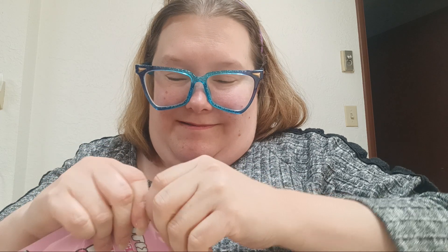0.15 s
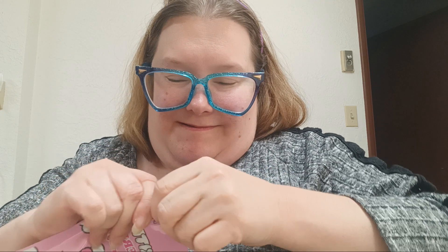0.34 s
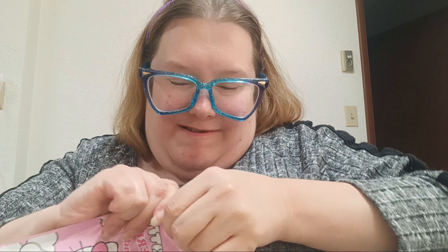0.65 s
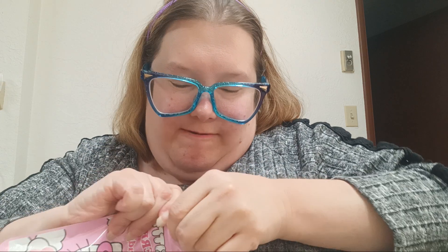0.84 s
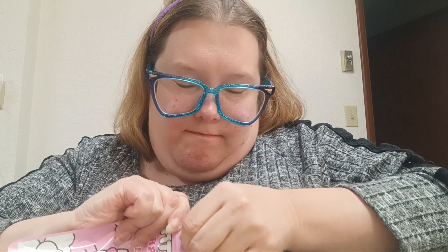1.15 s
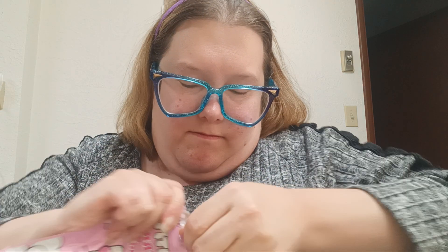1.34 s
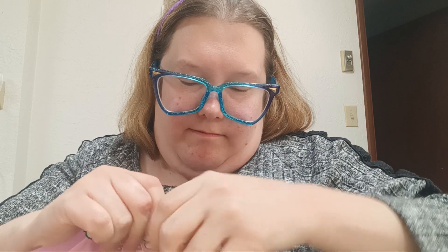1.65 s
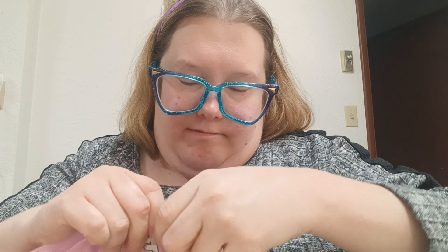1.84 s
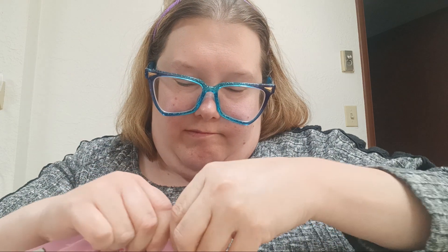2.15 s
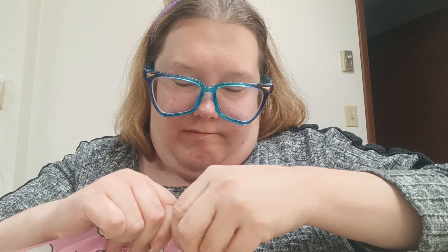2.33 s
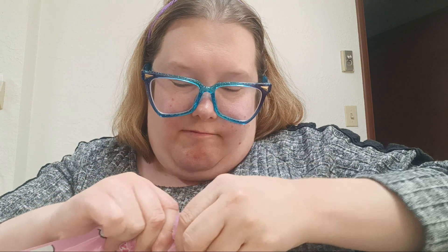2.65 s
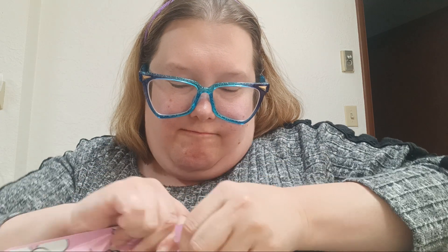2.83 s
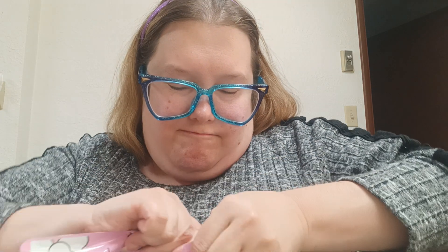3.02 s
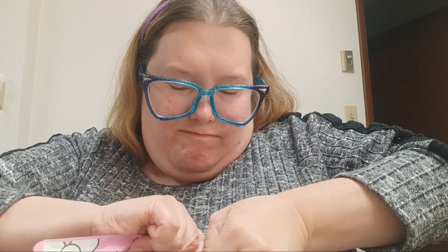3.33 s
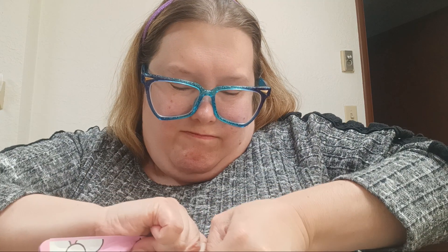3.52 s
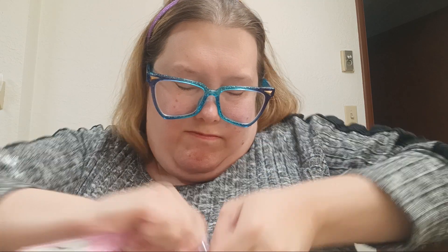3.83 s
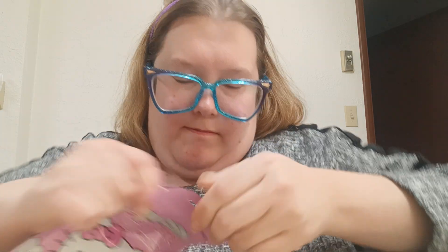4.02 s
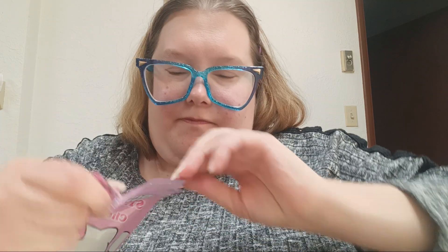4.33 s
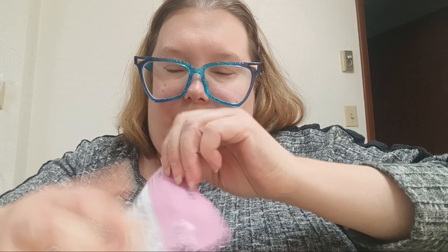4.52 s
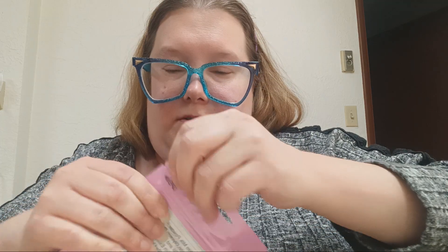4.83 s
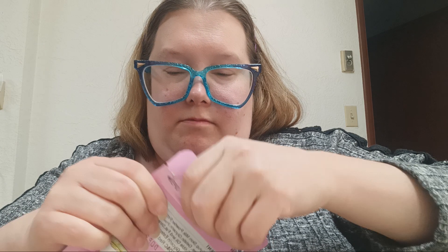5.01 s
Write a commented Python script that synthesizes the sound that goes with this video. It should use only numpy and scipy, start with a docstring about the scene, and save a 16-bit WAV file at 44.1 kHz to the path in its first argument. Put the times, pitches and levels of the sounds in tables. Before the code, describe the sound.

Close, dry crinkling of a small plastic packet being pulled open by hand: uneven snaps, tight rubbing creaks and final loud crackles.

```python
"""In a small room, fingers pull and tear at a plastic sweet wrapper close to the right microphone of a phone.
Creases snap over: noise-burst slips ring air pouch and film modes; crowds of tiny creases rustle.
Stick-slip rubs creak on taut film, band noise makes a swish and table rumble, brief pushes make air puffs.
The left microphone hears the wrapper later, shadowed by the phone; room reflections and a low murmur lie under it."""
import sys
import numpy as np
from scipy import signal
from scipy.fft import rfft, irfft, next_fast_len
from scipy.io import wavfile
from scipy.ndimage import uniform_filter1d

SR = 44100
rng = np.random.default_rng(int(sys.argv[2]) if len(sys.argv) > 2 else 0)


def log_audio(samples):
    """Write samples as a 16-bit WAV file to the path given in sys.argv[1]."""
    # one column per channel
    frames = np.atleast_2d(samples).T
    # limit to full scale, then quantise
    limited = np.clip(frames, -1, 1)
    pcm = np.round(limited * 32767).astype(np.int16)
    wavfile.write(sys.argv[1], SR, pcm)


N = 227811
GRAIN = 1024  # samples per slip
F_HZ = np.fft.rfftfreq(GRAIN, 1 / SR)

# creases snapping, peaks before the microphone's treble loss:
# (time [s], pouch boom [dB], panel ring [dB], tick [dB])
SNAPS = [(0.034, -36, -37, -15),  (0.0605, -23, -18, -24), (0.0724, -16.5, -13.5, -7.5),
         (0.0852, -13.5, -35, -5),  (0.0982, -19, -9.5, -7.5), (0.158, -19, -30, -36),
         (0.1731, -12.5, -11, -3), (0.1813, -11, -27, -7.5), (0.3267, -21.5, -23, -22),
         (0.3733, -26, -25, -21), (0.4836, -28, -27, -14.5), (0.5285, -17, -21, -18.5),
         (0.5565, -17.5, -40, -29), (0.6498, -15.5, -23.5, -20.5), (0.6874, -14.5, -9.5, -4.5),
          (0.7269, -12, -43, -26), (0.7447, -14, -17, -6.5), (0.7983, -14.5, -6.5, -4),
         (0.8363, -18, -13, -1.5), (0.8772, -24, -24.5, -38), (0.964, -21, -45, -50),
         (1.0368, -30.5, -88, -62), (1.0532, -23, -31.5, -110), (1.077, -25, -30, -59),
         (1.094, -21.5, -21.5, -43), (1.1113, -18.5, -14.5, -4), (1.146, -28, -20.5, -18),
         (1.189, -18.5, -19.5, -28), (1.2393, -26, -18, -15.5), (1.252, -17.5, -21, -23),
         (1.328, -23.5, -30, -37), (1.407, -24, -16, -12.5),  (1.4484, -60, -19, -6.5),
         (1.5782, -14.5, -15, -2), (1.633, -18, -10, -6.5), (1.672, -21, -24, -24),
         (1.68, -23.5, -21.5, -22), (1.7605, -25, -15, -16), (1.7684, -65, -48, -8),
         (1.7882, -19, -21, -14), (1.8153, -18, -17.5, -12), (1.847, -32, -23, -20.5),
         (1.866, -29, -35, -43), (1.927, -31.5, -33, -38), (1.9603, -24.5, -30, -23),
         (1.993, -29.5, -17, -20.5), (2.092, -31, -28.5, -26), (2.162, -32.5, -30, -47),
         (2.4134, -22.5, -18.5, -34),  (2.459, -29, -37, -33), (2.474, -17.5, -17, -3),
         (2.477, -23.5, -13, -11), (2.5195, -15, -11.5, -0.5),  (2.554, -21, -17, -6),
         (2.561, -24, -17, -23), (2.569, -16.5, -13.5, -2), (2.618, -27.5, -27, -27),
         (2.6399, -26, -16, -7.5), (2.65, -26.5, -35, -19), (2.663, -19, -21, -33),
         (2.6723, -17, -19, -3.5), (2.6826, -24, -15.5, -1.5), (2.695, -23, -16, -14),
         (2.724, -25, -22, -7.5), (2.74, -47, -3, -10), (2.7508, -20, -14.5, -5.5), (2.7585, -49, -38, -6),
         (2.8182, -19, -10, -4.5), (2.866, -47.5, -18, -11.5), (2.9638, -19.5, -16, -16),
         (3.1087, -27, -36, -20.5), (3.329, -24.5, -27, -10), (3.3364, -53, -19, -8),
         (3.417, -30, -22.5, -17), (3.4423, -15, -8.5, -2.5), (3.585, -33, -25, -33),
         (3.5898, -13.5, -12, -20), (3.621, -22.5, -9, -3.5), (3.6374, -17.5, -15, -14),
         (3.661, -17.5, -20, -14), (3.679, -15, -22, -30), (3.6856, -16, -13, -28),
         (3.708, -21.5, -30, -35), (3.732, -25, -37, -35), (3.773, -27, -17.5, -22), (3.79, -29, -4, -6),
         (3.8016, -19, -18, -11.5), (3.84, -28, -29, -42), (3.86, -25, -21.5, -45),
         (3.935, -38, -83, -20.5), (4.0233, -32, -25.5, -23.5), (4.084, -17, -11.5, -7),
         (4.124, -28, -34, -40), (4.212, -34, -14, 2.5), (4.2317, -27.5, -10.5, -25),
         (4.252, -54, -13, -12), (4.3628, -31.5, -21, -14.5), (4.477, -53, -42, -19),
         (4.4903, -27, -20.5, -33), (4.5034, -28, -13, -2.5), (4.524, -17, -20, -24),
         (4.5465, -26.5, -10.5, 2), (4.5634, -22, -23, -7), (4.5775, -27, -17.5, -7),
         (4.589, -22, -17.5, -30), (4.668, -21.5, -24, -41), (4.7509, -27, -17.5, -20),
         (4.805, -26.5, -13.5, -11.5), (4.852, -39, -24, -27), (4.8753, -23, -17.5, -28),
         (4.951, -28, -23, -21), (4.968, -20, -19.5, -42), (5.0684, -21.5, -52, -34),
         (5.115, -24, -32, -36), (5.138, -15.5, -9, -5)]


def snaps():
    """Single creases snap over, each a sudden release of the film."""
    return creases(*np.transpose(SNAPS), decay_s=0.00072, spread_s=0.0022)


# modes of the air pouch under the film: (frequency [Hz])
POUCH_MODES_HZ = np.array([635, 737, 960, 1176])
# modes of the film panels: (frequency [Hz])
PANEL_MODES_HZ = np.array([1913, 2570, 3513, 5060, 5350])
MODE_SCATTER_DB = 2.5  # mode mix differs from crease to crease
TILT_PER_DB = 0.11  # panel mode slope exponent per dB of panel minus pouch level


def mode_mix(count, modes_hz, slope):
    """Response of damped modes with alternating sign and scattered gain, one row per crease."""
    gain = undb(MODE_SCATTER_DB * rng.standard_normal((count, len(modes_hz))))
    sign = (-1) ** np.arange(len(modes_hz))
    centre_hz = modes_hz[:, None]
    return gain * sign * modes_hz ** slope @ ring(F_HZ, centre_hz, 0.42 * centre_hz)


def creases(time_s, pouch_db, panel_db, tick_db, decay_s, spread_s):
    """Each crease booms in the air pouch, rings the panels and ticks, with its own mix of modes."""
    count = len(time_s)
    spectrum = rfft(slip(count, decay_s, spread_s))
    # flattened: a release drives all modes alike
    local_power = uniform_filter1d(np.abs(spectrum) ** 2, size=13, axis=1)
    push = irfft(spectrum / np.sqrt(local_power), GRAIN)
    # creases that hardly move the pouch ring higher
    tilt = np.clip(TILT_PER_DB * (panel_db - pouch_db) - 0.9, -1.5, 1)[:, None]
    pouch = mode_mix(count, POUCH_MODES_HZ, 0.1)
    panel = mode_mix(count, PANEL_MODES_HZ, tilt)
    pouch = pouch * ring(F_HZ, 973.0, 6600.0) ** 3  # a small pouch radiates little bass
    body = shaped(push, pouch, pouch_db) + shaped(push, panel, panel_db)
    return heard(time_s, body, tick_db, 0.53 * decay_s, spread_s)


def slip(count, decay_s, spread_s):
    """Noise bursts: a sharp release, then two weaker after-slips."""
    t = np.arange(GRAIN) / SR
    start_s = spread_s * rng.random((count, 3, 1))
    size = 0.56 * rng.random((count, 3, 1))
    start_s[:, 0], size[:, 0] = 0, 1
    age_s = t - start_s
    envelope = (size * (age_s >= 0) * np.exp(-np.abs(age_s) / decay_s)).sum(axis=1)
    return envelope * rng.standard_normal((count, GRAIN))


def ring(f_hz, centre_hz, width_hz):
    """Response of one damped resonance, gain 1 at its centre."""
    return 1j * f_hz * width_hz / (centre_hz ** 2 - f_hz ** 2 + 1j * f_hz * width_hz)


def shaped(burst, response, peak_db):
    """Ring the bursts and scale each to its peak."""
    y = irfft(rfft(burst) * response, GRAIN)
    return y * (undb(peak_db) / np.abs(y).max(axis=1))[:, None]


def undb(db):
    """Amplitude gain of a level in dB."""
    return 10 ** (np.asarray(db) / 20)


# microphone port resonances: (frequency [Hz], width [Hz], level [dB])
PORT = [(10155, 1090, 2.5), (12870, 3070, -7.5)]


def heard(time_s, body, tick_db, decay_s, spread_s, roam=1):
    """Add port-rung ticks, lay grains out; rows: near microphone, far microphone before its path."""
    port = sum((-1) ** k * undb(db) * ring(F_HZ, hz, width_hz)
               for k, (hz, width_hz, db) in enumerate(PORT))
    spot = roam * (rng.random((len(time_s), 2)) - .5)  # spot on the film: far level and lag vary
    out = np.zeros((2, N + 2 * GRAIN))
    # treble beams: each microphone gets its own tick, smeared on the shadowed side
    for ear, smear in enumerate((1, 1.8)):
        tick = shaped(slip(len(time_s), smear * decay_s, spread_s), port, tick_db)
        grain = (body + tick) * undb(ear * 2.8 * spot[:, :1])
        first = (time_s * SR + ear * 8 * spot[:, 1]).astype(int).clip(0)
        np.add.at(out[ear], first[:, None] + np.arange(GRAIN), grain)
    return out[:, :N]


def rustle(rate_hz=330., scatter_db=4.5):
    """Many small creases: a dense crowd when the film moves fast, lone crackles when it creeps."""
    count = int(rate_hz * N / SR)
    time_s = rng.random(count) * N / SR
    body_db, tick_db, _ = crumple(time_s)
    spread_db = np.clip(scatter_db + 0.56 * (-45.0 - body_db), 2.4, 7)  # wider when quiet
    size_db = spread_db * (rng.exponential(size=count).clip(0, 3.0) - 1.6)
    # the treble of so many tiny ticks blends into a smoother hiss
    lean_db = 4.23 * rng.standard_normal((3, count)) + np.outer((1, 1, .45), size_db)
    pouch_db = body_db - 0.5 + lean_db[0]
    panel_db = body_db + 3.5 + lean_db[1]
    return creases(time_s, pouch_db, panel_db, tick_db + 5.5 + lean_db[2], 0.00095, 0.003)


# hand moves that crumple the film, levels before offsets in the layers they drive:
# (fully under way [s], held [s], body [dB], tick [dB], table rumble [dB])
MOVES = [(0.0, 0.027, -43.5, -44, -59), (0.07, 0.053, -33.5, -51, -51), (0.183, 0.0067, -33, -33, -42),
         (0.3, 0.044, -43, -45, -80), (0.699, 0.02, -69, -53, -52), (0.832, 0.049, -44, -38, -69),
         (1.112, 0.008, -33, -35.5, -64), (1.429, 0.088, -43.5, -36.5, -70),
         (1.575, 0.062, -36, -53, -56.5), (1.798, 0.013, -38, -51, -56.5), (2.2, 0.21, -52.5, -44, -68),
         (2.377, 0.38, -44, -37.5, -58.5), (2.599, .29, -36.5, -34.5, -61.5), (3.1, 0.1, -44.5, -64, -77),
         (3.634, 0.062, -29.5, -28, -41.5), (3.76, 0.073, -41, -64, -68), (4.05, 0.073, -42, -40.5, -58.5),
         (4.219, 0.069, -32, -30, -44.5), (4.511, 0.083, -31, -30.5, -46.5),
         (4.7, 0.054, -39.5, -37, -48.5), (4.837, 0.01, -36.5, -30.5, -60), (5.02, 0.15, -42, -40.5, -70)]
RISE_DB_S, SETTLE_DB_S = 364, 134


def crumple(time_s):
    """Body, tick and rumble level in dB: each move swells, holds and settles; their powers add."""
    start_s, held_s, *levels_db = np.transpose(MOVES)[:, :, None]
    before_s = np.clip(start_s - time_s, 0, None)
    after_s = np.clip(time_s - start_s - held_s, 0, None)
    fade_db = RISE_DB_S * before_s + SETTLE_DB_S * after_s
    return [10 * np.log10((undb(db - fade_db) ** 2).sum(axis=0) + 1e-12) for db in levels_db]


# mean resonances of the taut film: (frequency [Hz], width [Hz], level [dB])
TAUT_FILM = [(803, 115, 6), (1097, 68, 8), (2001, 410, 4), (3880, 440, -7)]
# fingertip rubs, mean levels:
# (time [s], length [s], first slip rate [Hz], last slip rate [Hz], body [dB], tick [dB])
RUBS = [(2.176, .014, 167, 173, -35.5, -47), (2.247, 0.1, 49.7, 42.9, -38, -49),
        (2.35, .056, 61.3, 99.3, -29, -36), (2.933, 0.072, 283, 410.3, -30.5, -44),
        (3.045, 0.077, 328, 373, -30, -35.5), (3.134, .06, 187, 230.6, -25, -22.5),
        (3.2301, .052, 130.7, 153.8, -25.5, -19.5), (3.297, .02, 67.8, 70.7, -25, -20),
        (3.3497, .04, 32.3, 76.7, -25, -22.5)]


def creak():
    """A slip at every turn of the stick-slip cycle; the same spot rings, its pitch shifting with tension."""
    slips = []
    for start_s, length_s, first_hz, last_hz, body_db, tick_db in RUBS:
        age_s = np.arange(0, length_s, 1 / SR)
        turns = np.floor(first_hz * age_s + (last_hz - first_hz) * age_s ** 2 / (2 * length_s))
        slip_ages_s = age_s[np.diff(turns, prepend=-1) > 0]
        slips += [(start_s + a, body_db, tick_db) for a in slip_ages_s]
    time_s, body_db, tick_db = np.transpose(slips)
    jitter, uneven, tighten = rng.standard_normal((len(time_s), 3)).T
    tension = 1 + 0.038 * tighten[:, None]
    film = sum((-1) ** k * undb(db) * ring(F_HZ, tension * hz, width_hz)
               for k, (hz, width_hz, db) in enumerate(TAUT_FILM))
    push = np.zeros((len(time_s), GRAIN))
    push[:, :5] = -1  # a short, even release
    uneven_db = 2.3 * uneven
    body = shaped(push, film, body_db + uneven_db)
    return heard(time_s + 0.00018 * jitter, body, tick_db + uneven_db, 0.00042, 0.00068, roam=0)


def band_noise(edges_hz, shape):
    """White noise through a second-order bandpass."""
    band = signal.butter(2, edges_hz, "band", fs=SR, output="sos")
    return signal.sosfilt(band, rng.standard_normal(shape))


SWISH_S, SWISH_FADE_S, SWISH_DB = 0.85, 0.039, -32.5
SWISH_HZ, SWISH_WIDTH_HZ = 6600, 1000


def swish():
    """An airy hiss of band noise as the film slides back after a pull."""
    age_s = np.clip(np.arange(N) / SR - SWISH_S, 0, None)
    hiss = band_noise((SWISH_HZ - SWISH_WIDTH_HZ / 2, SWISH_HZ + SWISH_WIDTH_HZ / 2), (2, N))
    envelope = (1 - np.exp(-age_s / 0.015)) * np.exp(-age_s / SWISH_FADE_S)
    return hiss / hiss.std() * undb(SWISH_DB) * envelope


# air puffs on the near port, level before the envelope: (time [s], level [dB], time scale [s])
PUFFS = [(0.195, -36, 0.0035), (1.668, -31, 0.00047), (4.547, -8, 0.0013)]


def puffs():
    """A sudden pressure push that swings back once."""
    t, out = np.arange(N) / SR, 0
    for start_s, db, scale_s in PUFFS:
        age = np.clip(t - start_s, 0, None) / scale_s
        out = out + undb(db) * (1 - np.exp(-age * 12)) * np.exp(-age * 0.37) * np.cos(age * 0.41)
    return out


def rumble(thud_db=-4):
    """The packet drags on the table as the hands move; the table thuds faintly under it."""
    drag = band_noise((208, 477), N)
    thud = band_noise((75, 495), N)
    t = np.arange(0, N / SR + .01, .002)
    gain = undb(np.interp(np.arange(N) / SR, t, crumple(t)[2]))
    return drag / drag.std() * gain, thud / thud.std() * gain * undb(thud_db)


# shadow on the path round the phone: (frequency [Hz], level [dB])
SHADOW = [(500, -5.5), (750, 3.5), (1050, -3.5), (1400, -12.5), (1800, -4), (2700, 3), (3500, -10.5),
          (5000, 2.5), (8300, -14.5), (10500, -15.5), (13500, -5)]
# lag on that path: (frequency [Hz], lag [ms])
LAG = [(600, 1.15), (1210, 1.37), (1720, 1.63), (2670, 1.51)]


def round_phone(x):
    """The path round the phone to the left microphone shadows and delays each frequency."""
    size = next_fast_len(N + GRAIN)
    f_hz = np.fft.rfftfreq(size, 1 / SR)
    db, lag_ms = (np.interp(np.log(f_hz + 1), np.log(hz), value)
                  for hz, value in map(np.transpose, (SHADOW, LAG)))
    delay = np.exp(-2j * np.pi * f_hz * lag_ms / 1000)
    return irfft(rfft(x, size) * undb(db) * delay, size)[:N]


ROOM_T60_S, ROOM_DB, ROOM_BAND_HZ = 0.36, -12.5, (1430, 9800)


def room(x):
    """Dense fading reflections, different at each microphone."""
    t = np.arange(int(ROOM_T60_S * SR)) / SR
    fade = undb(-60 * t / ROOM_T60_S) * (1 - np.exp(-t / 0.00008))
    tail = rng.standard_normal((2, len(t))) * fade
    tail = signal.lfilter(*signal.butter(1, ROOM_BAND_HZ, "band", fs=SR), tail)
    tail = tail / np.sqrt((tail ** 2).sum(axis=1, keepdims=True))  # unit energy
    return undb(ROOM_DB) * signal.fftconvolve(x, tail, axes=1)[:, :N]


FLOOR_DB = -68.5


def room_air():
    """A faint low murmur of band noise, separate at each microphone."""
    band = signal.butter(1, (60, 240), "band", fs=SR)
    floor = signal.lfilter(*band, rng.standard_normal((2, N)))
    return undb(FLOOR_DB) * floor / floor.std()


def scene():
    """Mix wrapper, room and air; rows: left, right. Puffs and thud reach only the right."""
    drag, thud = rumble()
    near, far = snaps() + rustle() + creak() + swish() + drag
    wet = room(near[None])
    left = round_phone(far + wet[0])
    right = near + wet[1] + puffs() + thud
    return np.array([left, right]) + room_air()


TOP_HZ = 16400


def record(dry):
    """The microphones fade towards the top, the highest peaks clip, the top is cut."""
    soft = signal.sosfilt(signal.butter(2, 14000, fs=SR, output="sos"), dry)
    top_cut = signal.ellip(10, .2, 85, TOP_HZ, fs=SR, output="sos")
    return signal.sosfilt(top_cut, np.clip(soft, -1, 1))


dry = scene()
out = record(dry)
log_audio(out)
```